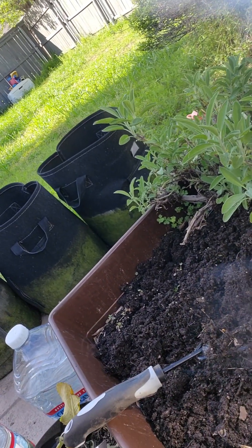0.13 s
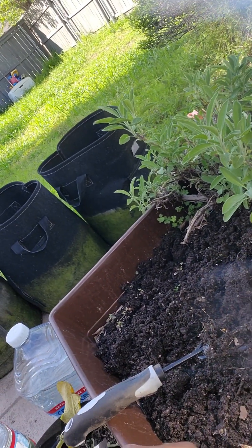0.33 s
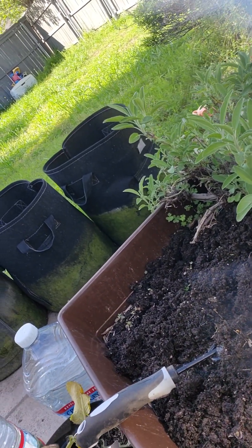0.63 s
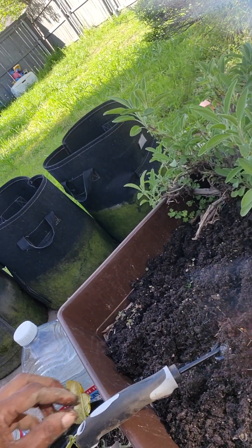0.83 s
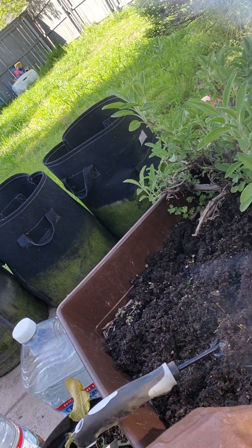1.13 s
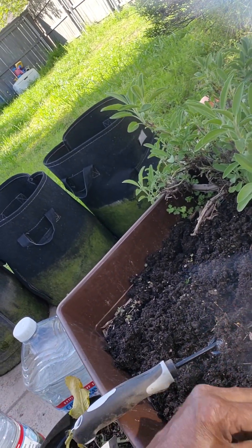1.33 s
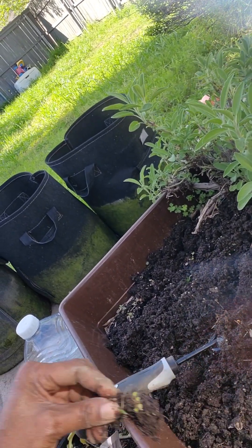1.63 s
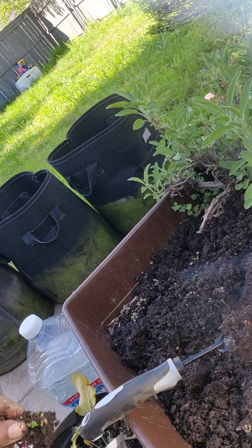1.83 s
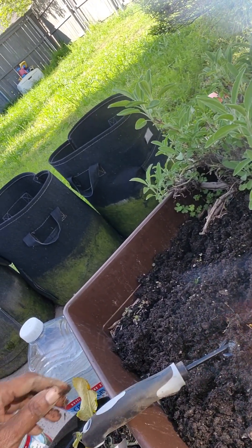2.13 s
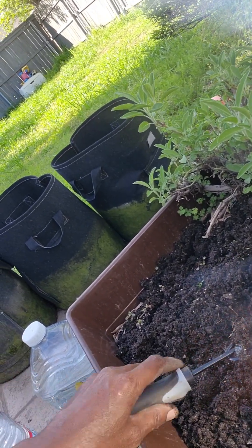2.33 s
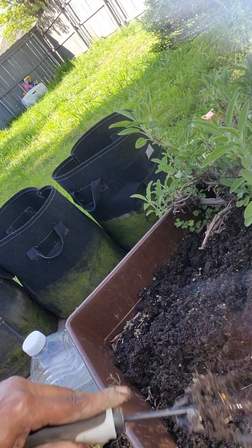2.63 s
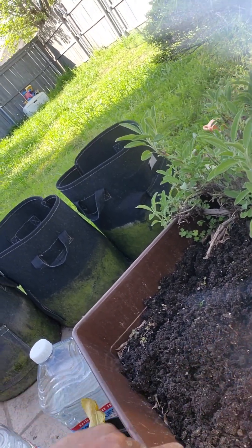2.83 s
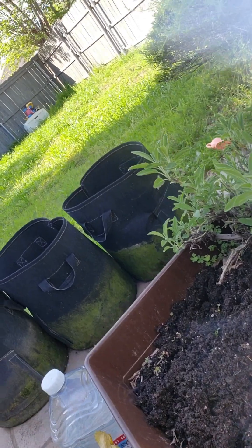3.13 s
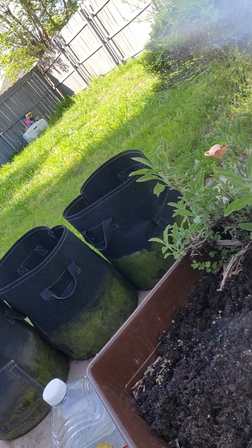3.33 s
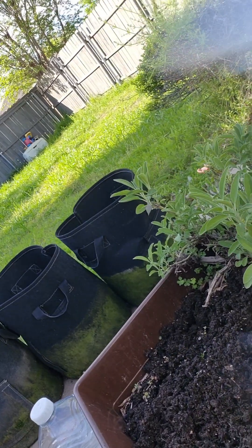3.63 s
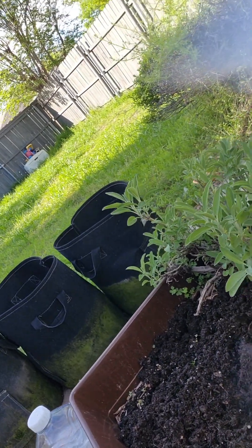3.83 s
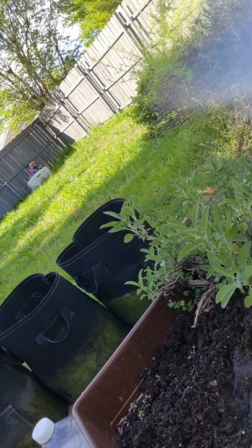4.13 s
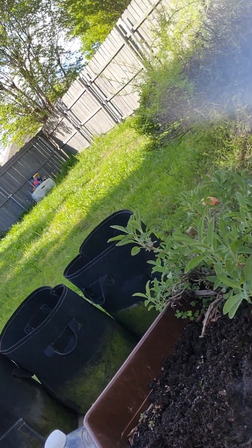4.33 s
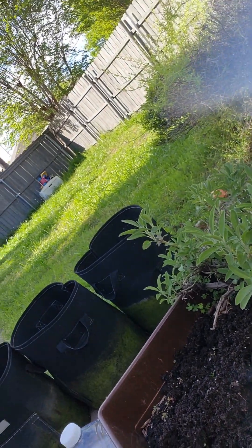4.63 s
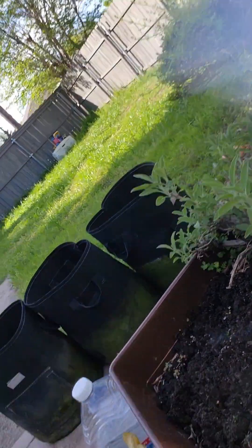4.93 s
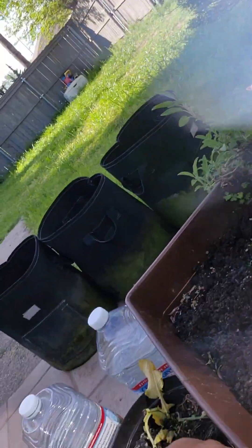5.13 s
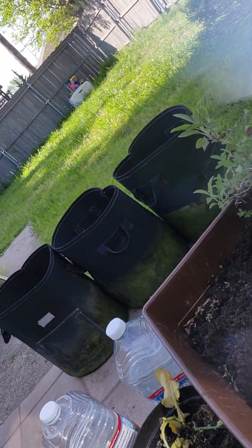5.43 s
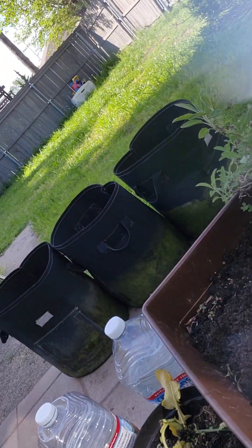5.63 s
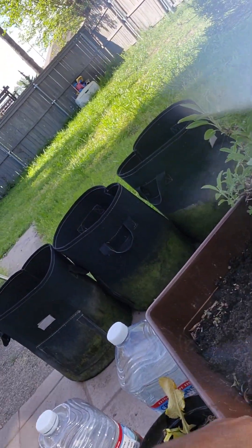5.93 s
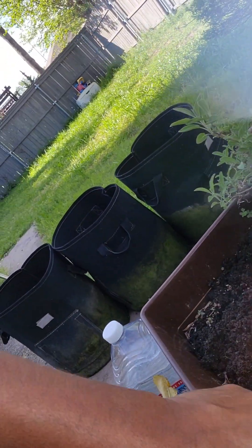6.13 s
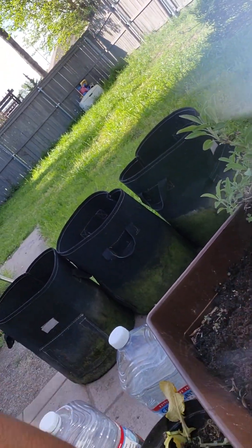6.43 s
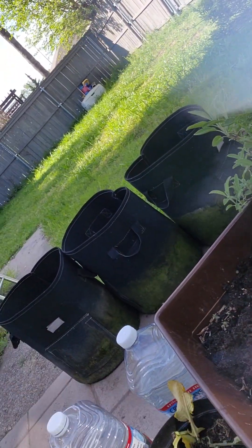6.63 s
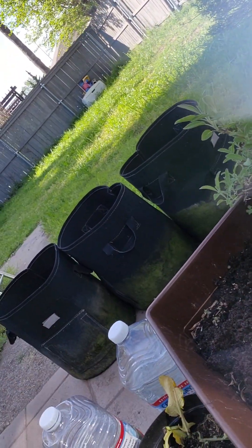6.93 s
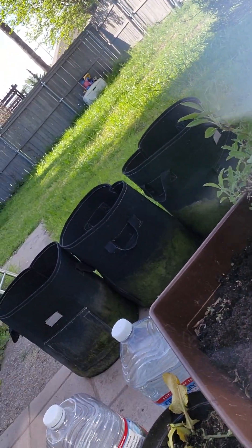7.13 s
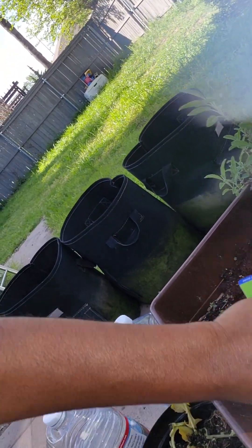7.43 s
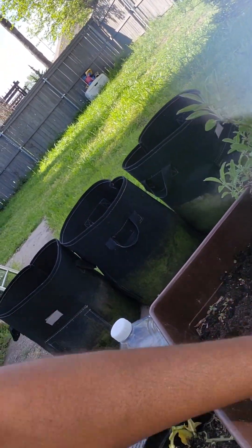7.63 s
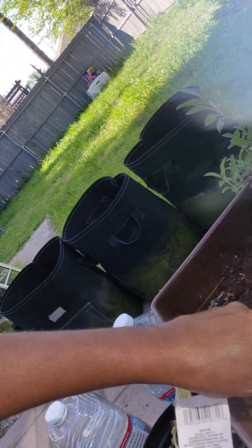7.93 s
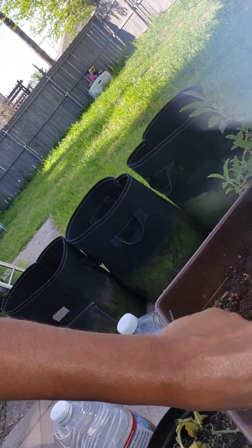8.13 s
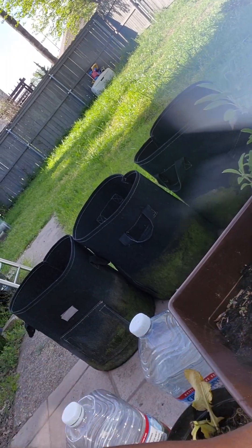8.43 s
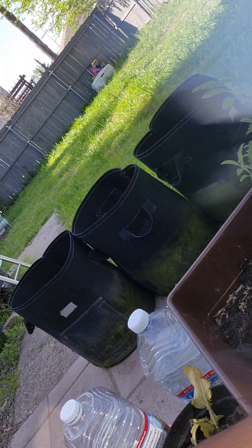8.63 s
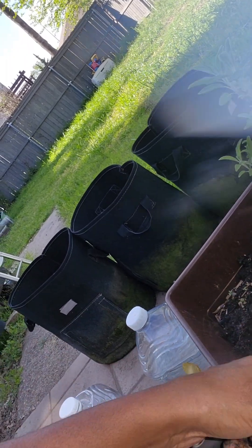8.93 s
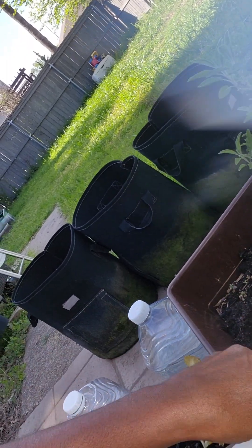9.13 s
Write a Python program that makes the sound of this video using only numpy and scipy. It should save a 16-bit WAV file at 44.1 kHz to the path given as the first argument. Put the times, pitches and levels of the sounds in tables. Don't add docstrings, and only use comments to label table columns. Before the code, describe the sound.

Outdoors in a back garden, a close stereo microphone catches hands working in a planter. Light leaf ticks come first, then denser rustling, soil scuffs and snapping stalks. A loud dry crack comes before the middle, then a pot is struck and, a second later, the hollow planter. Crackling continues and thins out over a low cooling-unit hum and distant traffic.

```python
import sys
import numpy as np
from scipy import signal
from scipy.fft import rfft, irfft
from scipy.io import wavfile

SR = 44100
rng = np.random.default_rng(int(sys.argv[2]) if len(sys.argv) > 2 else 0)


def to_wav(sig):
    pcm = np.clip(np.atleast_2d(sig), -1, 1) * 32767
    pcm = np.round(pcm).astype(np.int16)
    wavfile.write(sys.argv[1], SR, pcm.T)


def rack_gain(trim_db):
    fader = np.asarray(trim_db, float)
    return 10 ** (fader / 20)


N = 409248
CONTROL_STEP = 20

# (time [s], level [dB])
BREEZE = [(0.0, -51.5), (2.38, -56), (3.85, -51.5), (3.93, -46.5), (4.01, -58.5), (5.5, -48.5), (5.56, -53),
          (7.0, -51), (7.11, -47.5), (7.42, -60.5), (7.65, -49.5), (7.68, -66.5), (7.75, -51), (9.28, -55)]
# (time [s], level [dB])
UNIT = [(0, -46), (1.7, -49.5), (2.04, -46), (3.49, -45.5), (3.62, -37.5), (3.9, -41), (4.34, -43.5),
        (4.55, -40), (4.88, -48.5), (5.27, -51), (5.45, -37.5), (5.63, -47), (6.12, -51), (7.78, -47.5),
        (9.28, -42.5)]
# (time [s], level [dB])
TRAFFIC = [(0, -56), (3.49, -54.5), (3.9, -53.5), (4.55, -47), (4.88, -51.5), (5.27, -52), (5.45, -49.5),
           (5.63, -54), (6.2, -50.5), (7.78, -53.5), (9.28, -52.5)]
# (frequency [Hz], density [dB per Hz])
AIR_SPECTRUM = [(15, -27.5), (28, -4), (45, -4), (111, -1), (180, -9), (242, -9.5), (370, -12.5),
                (480, -19), (720, -24), (1000, -33), (1500, -50), (2300, -47.5), (7300, -52.5),
                (16000, -63)]
# (frequency [Hz], correlation, clipped to -1..1)
AIR_LIKENESS = [(30, 0.94), (70, 0.91), (130, 0.99), (290, 0.83), (640, 0.71), (1410, -2.1), (3100, 0.42),
                (15000, -0.66)]
# (frequency [Hz], left minus right [dB])
AIR_LEAN = [(60, -2.0), (240, 0.5), (950, -0.5), (3770, -5), (15000, 3)]
# (frequency [Hz], wander [Hz], level [dB])
MOTOR_TONES = [(236.3, 1.9, -57), (313.3, 7.1, -64.5), (352.3, 8.14, -63), (709.6, 1.2, -71.5),
               (890, 1.05, -76.5)]
CASING_HZ, CASING_WIDTH_HZ, CASING_DB = 118.2, 29, -49

# (start [s], hold [s], level [dB], dullness [dB])
REACHES = [(0.088, 0.02, -78, -14), (0.156, 0.038, -73, -3), (0.333, 0.22, -90, -6),
           (1.27, 0.095, -90, -14), (2.28, 0.8, -73.5, 2), (2.97, 0.26, -64, 4), (3.27, 0.86, -66.5, 3.5),
           (3.647, 0.042, -58.5, 0.5), (4.112, 0.17, -60.5, 3), (4.223, 0.068, -62.5, 1),
           (4.375, 0.088, -59.5, -0.5), (4.515, 0.28, -59, 2), (4.857, 0.12, -71.5, 6),
           (5.17, 0.2, -58.5, 1.5), (5.408, 0.19, -60.5, 1), (5.618, 0.15, -68.5, -2.5),
           (6.053, 0.087, -67.5, 3.5), (6.204, 0.049, -54.5, 0.5), (6.314, 0.53, -60.5, 1),
           (6.9, 0.34, -67, -2.5), (7.152, 0.13, -62, 6.5), (7.352, 0.3, -64.5, -1),
           (7.595, 0.089, -63.5, 6), (7.767, 0.15, -64.5, 1.5), (8.047, 0.16, -65, 5),
           (8.23, 0.32, -66, -1), (8.443, 0.16, -63, 3), (8.626, .2, -69, 1.5), (8.956, 0.11, -69.5, 0)]
REACH_IN_DB_PER_S, REACH_OUT_DB_PER_S = 222.5, 131.5
# dull, middle, bright part [dB]
REACH_COLOUR_DB = [-6.5, 2, -3]
# dull, middle, bright part [dB]
REST_DB = [-70, -106, -82]
# (time [s], length [s], level [dB], dullness [dB])
SCUFFS = [(0.59, 0.05, -79.5, -16), (0.73, 0.039, -62.5, 6.5), (1.21, 0.11, -71.5, -3),
          (1.898, 0.036, -68.5, -10), (2.027, 0.067, -57.5, 6.5), (2.365, 0.12, -61, 5),
          (2.788, 0.016, -53, 1.5), (2.8, 0.023, -44.5, -2), (2.821, 0.024, -52.5, 5),
          (2.842, 0.028, -54, -2), (2.979, 0.11, -56, 1), (4.185, 0.17, -65, 14), (4.507, 0.062, -68, 15.5),
          (4.654, 0.074, -47, 8), (5.152, 0.005, -50, -10), (5.189, .011, -60, -7), (5.399, 0.16, -54, 5.5),
          (6.237, 0.036, -50, -1), (6.44, 0.029, -54, 6.5), (6.533, 0.1, -54.5, 2), (7.033, 0.083, -59, 5),
          (7.151, 0.019, -46, 5), (7.152, 0.067, -55, 4), (7.226, 0.028, -64.5, 26.5),
          (8.048, 0.096, -63, 7), (8.115, 0.071, -51.5, 7), (8.46, 0.22, -68.5, 15)]
# (time [s], peak [dB], dullness [dB])
LEAVES = [(0.0925, -41, -20), (0.16, -37, -6), (0.7202, -30, -2.5), (1.315, -52, -7), (2.072, -46, -12),
          (2.19, -47.5, -5), (1.3658, -59, -10), (1.9031, -54, -8), (2.0393, -49, 6), (2.361, -53, -3),
          (2.5945, -50, -4), (2.6564, -57, -13), (3.1462, -47, 0), (3.2041, -47, -3), (3.6122, -52, 4),
          (6.0422, -53, -3), (6.2886, -43, -8), (6.7875, -48, 2), (9.0, -48, 8), (2.754, -35, -6),
          (2.8444, -52, -2), (3.337, -46, -4), (3.4147, -46, -3), (3.376, -46, 3), (3.6995, -15, 7.5),
          (3.739, -45, -6), (4.3625, -46, 6), (4.535, -44, -8), (5.1162, -26, 14), (5.6146, -42, -8.5),
          (5.7586, -41, 11), (6.187, -35.5, -11), (6.2243, -32.5, -7), (6.248, -25, -3), (6.8003, -37.5, 6),
          (6.884, -36, -2), (7.004, -31, 0.5), (7.0306, -36.5, -5), (7.0427, -36, 3), (7.0355, -35.5, 0),
          (7.0558, -38.5, 9), (7.066, -30.5, -1), (7.072, -31.5, 7), (7.1559, -25, -1), (7.297, -38, 12),
          (7.409, -45, -1), (7.412, -39, -7), (7.418, -36, 1), (6.995, -42, 4), (7.02, -55, 4),
          (7.177, -40, 1), (7.192, -40, -2), (.395, -56, -1), (2.738, -50, -2), (8.165, -44, 2),
          (8.086, -35.5, 10), (8.069, -45, 5), (8.078, -45, 4), (5.228, -42, 2), (3.59, -52, -3),
          (3.93, -47, 13), (8.4098, -41.5, 8)]
# (time [s], peak [dB], dullness [dB])
STALKS = [(.0761, -69, -19), (.7821, -50.5, 3), (.821, -46, -3), (.8275, -49, -13), (.835, -43.5, 1),
          (2.3056, -52, -1), (2.417, -43.5, 10), (2.4473, -49, 15.5), (2.424, -45, 6), (4.143, -50, 14),
          (2.5612, -48.5, 0), (2.7476, -44.5, 16.5), (2.8085, -31.5, 5), (2.96, -39.5, -7),
          (3.768, -44.5, 2.5), (4.0895, -58, -21), (4.1071, -28, 1.5), (4.295, -46, 9), (4.436, -46, 7),
          (4.672, -31, 8), (4.693, -38, -4), (4.938, -48, 7), (6.0614, -52, -6), (6.2515, -32, -10.5),
          (6.571, -41.5, 11), (7.827, -55, 21), (7.87, -50, 11), (7.231, -46, 24), (4.521, -51, 11),
          (4.718, -52.5, 4), (8.1191, -35, 1), (8.144, -44, 7), (8.59, -36.5, 8), (8.82, -56, 16),
          (8.957, -54.5, -6)]
LEAF_HUMP_DB, STALK_HUMP_DB, SCUFF_HUMP_DB = 10.5, 2, 5.5
LEAF_FLOOR_DB, BROAD_FLOOR_DB = -31.5, -10
SNAP_T60_S, CLICK_DB, SCATTER_DB = 0.009, 12, -14.5
# (frequency [Hz], gain [dB])
HAND_COLOUR = [(500, -21.5), (800, 10.5), (1500, 8), (2500, 1.5), (3700, -5.5), (4800, -1.5), (6200, -6),
               (7500, -4.5), (8700, 1.5), (10500, -5), (12500, -2), (14500, -1), (16500, -9)]
# (frequency [Hz], left minus right [dB])
HAND_LEAN = [(60, -2.0), (180, -0.5), (550, 4), (1650, -1.5), (4970, -3.5), (15000, -5.5)]
HAND_LAG_S, WALL_LAG_S = 0.00026, 0.00017

# (time [s], frequency [Hz], level [dB], blur [Hz])
WHINE = [(1.0, 1950, -86, 80), (1.15, 1980, -88, 80), (1.18, 2090, -78, 50), (1.29, 2160, -83, 50),
         (1.31, 2230, -75, 10), (1.37, 2230, -77, 10), (1.39, 2400, -95, 60), (1.41, 2580, -78, 40),
         (1.56, 2600, -85, 90), (1.66, 2780, -83, 90), (1.68, 3050, -81, 50), (1.84, 3050, -81, 60),
         (1.87, 2900, -83, 110), (2.15, 2900, -81, 120), (2.7, 2920, -78, 120), (3.15, 2650, -71, 150),
         (3.3, 2450, -73, 150), (3.55, 2100, -105, 150)]

# (time [s], peak [dB], wall pitch [Hz], hardness [dB], t60 [s])
TAPS = [(2.308, -45.5, 316, -22, 0.02), (2.414, -50.5, 454, 4, 0.025), (2.422, -47, 446, -6, 0.026),
        (2.794, -49.5, 437, -16, 0.047), (2.812, -44.5, 290, -5, 0.038), (3.266, -40.5, 290, -9, 0.02),
        (4.541, -42.5, 303, -7, 0.05), (4.67, -45.5, 610, 6, 0.023), (5.314, -52.5, 440, -5, 0.057),
        (5.412, -33, 281, 7, 0.044), (5.46, -33.5, 313, -9, 0.071), (6.223, -50.5, 293, -8, 0.15),
        (6.478, -39.5, 279, -42, 0.042), (7.156, -56.5, 645, -29, 0.059), (7.23, -40.5, 335, 16.5, 0.022),
        (8.19, -51.5, 317, 3, 0.037), (8.41, -52.5, 670, -26, 0.025), (8.593, -47, 430, 17.5, 0.02),
        (8.69, -69, 437, -35, 0.036), (8.897, -52.5, 462, -60, 0.049)]
# (pitch ratio, level [dB])
WALL_OVERTONES = [(1.0, 14), (1.55, 6.5), (2.2, 8), (3.3, 5.5), (4.4, -17)]
UPPER_DB, UPPER_PER_HARDNESS = -8.5, 0.22
TOP_PER_HARDNESS = 0.3
# (time [s], peak [dB], crack [dB], crack dullness [dB], tail [dB])
BLOWS = [
    (5.1181, -9, -22.5, 1, -23),
    (5.1217, -24.5, -33, 7, -35),
    (6.1178, -6, -22, 7.5, -27.5),
    (6.133, -16, -48.5, 9, -40),
]
SOFT_DB_PER_OCTAVE = [0.6, 3, 0.69, 15]
TAIL_BOOM_DB = [-7, -6, 0.5, -1.5]
# (frequency [Hz], level [dB], t60 [s])
POT_MODES = [(136, -2.5, 0.029), (290, 4, 0.062), (401.6, -13.5, 0.17), (563, -10, .06), (660, -3, 0.065),
             (814, -1.5, 0.021), (1028, -8.5, 0.04), (1370, -9.5, 0.06), (1560, -11, 0.064),
             (1960, 1, 0.016), (2730, -10.5, 0.065), (4470, 3, 0.0077)]
# (frequency [Hz], level [dB], t60 [s])
PLANTER_MODES = [(137.7, -7.5, 0.053), (231, -54.5, 0.11), (318, 0.5, 0.026), (466, 3, 0.032),
                 (574, -2, 0.028), (626, 6, 0.022), (730, -21, 0.023), (962, 2, 0.0091),
                 (1212, -4.5, 0.054), (1500, -36, 0.027), (2270, 2, 0.023), (2940, -14, 0.0146),
                 (3450, -26.5, 0.011)]
BUILD_UP_CYCLES = 0.44
# (frequency [Hz], left minus right [dB])
WALL_LEAN = [(120, 1), (300, 8), (600, 1), (1500, -5.5), (2400, -5), (4000, -0.5), (12000, -8)]
# (frequency [Hz], share [0..1])
WALL_LIKENESS = [(600, .8), (1100, .55), (3000, .4)]


def rms_one(x):
    return x / np.sqrt(np.mean(x ** 2) + 1e-20)


def in_time(rows):
    s, *columns = np.transpose(rows)
    step_s = np.arange(N // CONTROL_STEP + 2) * CONTROL_STEP / SR
    return [np.interp(step_s, s, column) for column in columns]


def fine(control):
    return np.interp(np.arange(N) / CONTROL_STEP, np.arange(len(control)), control)


def drift(rate_hz):
    r = np.exp(-2 * np.pi * CONTROL_STEP * rate_hz / SR)
    chance = rng.standard_normal(N // CONTROL_STEP + 2002)
    return rms_one(signal.lfilter([1], [1, -2 * r, r * r], chance)[2000:])


def at_hz(points, hz):
    points_hz, values = np.transpose(points)
    return np.interp(np.log(hz), np.log(points_hz), values)


def lean_gain(points, hz):
    return rack_gain(at_hz(points, hz) / 2 * np.array([[1], [-1]]))


def fft_hz():
    return np.maximum(np.arange(N // 2 + 1) * SR / N, 1)


def colour(x, points):
    return irfft(rfft(x) * rack_gain(at_hz(points, fft_hz())), N)


def band(x, low_hz, high_hz):
    return signal.sosfilt(signal.butter(2, [low_hz, high_hz], "band", fs=SR, output="sos"), x)


def add(track, sound, s):
    i = round(s * SR)
    track[..., i:i + sound.shape[-1]] += sound[..., :N - i]


def garden_air():
    swells_db = [db - db.mean() for db in in_time(BREEZE) + in_time(UNIT) + in_time(TRAFFIC)] + [0]
    edges_hz = [22, 42, 85, 135, 200, 320, 500, 750, 1100, 1800, 3500, 8000, 17000]
    white = rng.standard_normal((2, 2, N))
    out = 0
    for k, (low, high) in enumerate(zip(edges_hz, edges_hz[1:])):
        mid, side = band(white[k % 2], low, high)
        hz = np.sqrt(low * high)
        alike = np.clip(at_hz(AIR_LIKENESS, hz), -1, 1)
        swell_db = swells_db[np.searchsorted([85, 140, 1000], hz)]
        gain = fine(rack_gain(swell_db - 25.5 + 2.6 * drift(4.2)))
        pair = np.sqrt(1 + alike) * mid + np.sqrt(1 - alike) * side * [[1], [-1]]
        out = out + gain * lean_gain(AIR_LEAN, hz) * pair
    out = colour(out, AIR_SPECTRUM)
    for hz, wander_hz, level_db in MOTOR_TONES:
        phase = np.cumsum(fine(hz + wander_hz * drift(2.963))) * 2 * np.pi / SR
        out += fine(np.sqrt(2) * rack_gain(level_db + 0.95 * drift(7))) * np.sin(phase)
    return out


def casing():
    r = np.exp(-np.pi * CASING_WIDTH_HZ / SR)
    poles = [1, -2 * r * np.cos(2 * np.pi * CASING_HZ / SR), r * r]
    boom = rng.standard_normal(N)
    for _ in range(2):
        boom = signal.lfilter([1, 0, -1], poles, boom)
    unit_db, = in_time(UNIT)
    return rms_one(boom) * fine(rack_gain(CASING_DB + unit_db - unit_db.mean()))


def grit(per_s, spread_db, clump_db, bed):
    sizes = rack_gain(spread_db * np.minimum(rng.exponential(1, N), 4))
    born = rng.random(N) < per_s * fine(rack_gain(clump_db * drift(25))) / SR
    return rms_one(bed + rms_one(signal.lfilter([1], [1, -0.97], sizes * born)))


def tilt(hz, dull_db, hump_db, floor_db):
    low_db = dull_db - hump_db
    levels_db = [low_db + floor_db, low_db - 0.5, 0, 0.5 - dull_db - hump_db]
    return np.interp(np.log(hz), np.log([1200, 2500, 6000, 12500]), levels_db)


def reaching(hz):
    t = np.arange(N // CONTROL_STEP + 2) * CONTROL_STEP / SR
    place = np.interp(np.log(hz), np.log([1600, 3900, 10500]), [0, 1, 2])
    power = rack_gain(2 * np.interp(place, range(3), REST_DB))
    colour_db = np.interp(place, range(3), REACH_COLOUR_DB)
    for s, hold_s, level_db, dull_db in REACHES:
        rise_db = REACH_IN_DB_PER_S * np.maximum(s - t, 0)
        fall_db = REACH_OUT_DB_PER_S * np.maximum(t - s - hold_s, 0)
        power = power + rack_gain(2 * (level_db + colour_db + dull_db * (1 - place) - rise_db - fall_db))
    return np.sqrt(power)


def from_below(x, other, alike, lag_s):
    alike = np.clip(alike, 0, 1)
    late = np.roll(x, round(lag_s * SR))
    return np.array([alike * late + np.sqrt(1 - alike ** 2) * other, x])


def hands():
    snaps = [(*row, LEAF_HUMP_DB, LEAF_FLOOR_DB) for row in LEAVES]
    snaps += [(*row, STALK_HUMP_DB, BROAD_FLOOR_DB) for row in STALKS]
    bed = grit(600, 3.6, 4.5, 2.0)
    coarse = grit(600, 3.4, 3.5, 1.3)
    white = rng.standard_normal((2, 2, N))
    t = np.arange(SR // 12) / SR
    tints = rng.standard_normal((len(snaps), 16))
    crack = rack_gain(-60 * t / SNAP_T60_S) + rack_gain(SCATTER_DB - 60 * t / 0.04)
    strokes = [np.sin(np.pi * np.linspace(0, 1, round(1.146 * row[1] * SR)) ** 0.61) for row in SCUFFS]
    edges_hz = 700 * 2 ** (np.arange(0, 12.6) / 2.6)
    out = 0
    for k, (low, high) in enumerate(zip(edges_hz, edges_hz[1:])):
        hz = np.sqrt(low * high)
        grains = np.roll(bed if hz > 2000 else np.sqrt(bed), k // 4 * SR)
        rub = fine(reaching(hz) * rack_gain(7.5 + 2 * drift(3.3))) * grains
        scuff, burst, click = np.zeros((3, N))
        for (s, _, level_db, dull_db), stroke in zip(SCUFFS, strokes):
            tilt_db = tilt(hz, dull_db, SCUFF_HUMP_DB, BROAD_FLOOR_DB)
            add(scuff, rack_gain(level_db + tilt_db + 8.5) * stroke, s)
        for (s, peak_db, dull_db, hump_db, floor_db), tint in zip(snaps, tints):
            size = rack_gain(peak_db + tilt(hz, dull_db, hump_db, floor_db) + 0.78 * tint[k] + 1.0)
            add(burst, size * crack, s)
            add(click, size * rack_gain([CLICK_DB]) * np.sign(tint[-1]), s)
        alike = at_hz([(700, 0.7), (4000, 0.16), (16000, 0.27)], hz)
        source = white[k % 2] * np.sqrt(rub ** 2 + (scuff * coarse) ** 2 + burst ** 2)
        pair = from_below(*source, alike, HAND_LAG_S) + from_below(click, click, 0.86, HAND_LAG_S)
        out = out + band(pair, low, high) * lean_gain(HAND_LEAN, hz)
    return colour(out, HAND_COLOUR)


def far_whine():
    hz, level_db, blur_hz = in_time(WHINE)
    phase = np.cumsum(fine(hz + 20 * drift(8) + blur_hz * drift(70))) * 2 * np.pi / SR
    sides = [fine(drift(90)) * np.sin(phase) + fine(drift(90)) * np.cos(phase) for _ in "LR"]
    return fine(rack_gain(level_db + 2 * drift(16))) * np.array(sides)


def ring(hz, t60_s, rise_s):
    t = np.arange(SR // 4) / SR
    decay = rack_gain(-60 * t / max(t60_s, 0.003))
    return np.sin(2 * np.pi * hz * t) * decay * (1 - np.exp(-t / max(rise_s, 1e-5)))


def rattle(level_db, low_hz, high_hz, t60_s):
    t = np.arange(SR // 6) / SR
    noise = rng.standard_normal((2, len(t))) * rack_gain(level_db - 60 * t / max(t60_s, 0.003))
    steep = band(band(noise, low_hz, high_hz), low_hz, high_hz)
    return steep * np.sqrt(SR / 2 / (high_hz - low_hz))


def soft_taps(out):
    for s, peak_db, hz, hard_db, t60_s in TAPS:
        upper_db = UPPER_DB + UPPER_PER_HARDNESS * hard_db + 10.0
        top_db = TOP_PER_HARDNESS * min(hard_db, 0)
        chances = rng.standard_normal((len(WALL_OVERTONES), 2))
        for (ratio, part_db), (detune, loudness) in zip(WALL_OVERTONES, chances):
            mode = ring(hz * ratio * (1 + 0.055 * detune), t60_s / np.sqrt(ratio), 0.63 / hz / ratio)
            level_db = peak_db + part_db + upper_db * (ratio > 1.3) + top_db * (ratio > np.e)
            add(out, rack_gain(level_db + 2.0 * loudness + 5.0) * mode * [[1], [-0.4]], s)
        add(out, rattle(peak_db + hard_db, 1020, 3490, 0.65 * t60_s), s)
        add(out, rattle(peak_db + hard_db - 23.0, 3600, 12300, 0.014), s)
        add(out, rattle(peak_db - 0.5, 113, 1080, 1.9 * t60_s), s)
        add(out, rattle(peak_db - 11.0, 270, 1000, 0.28), s)


def hard_blows(out):
    bodies = (POT_MODES, POT_MODES, PLANTER_MODES, PLANTER_MODES)
    for blow, body, soft_db, boom_db in zip(BLOWS, bodies, SOFT_DB_PER_OCTAVE, TAIL_BOOM_DB):
        s, peak_db, crack_db, dull_db, tail_db = blow
        for k, (hz, part_db, t60_s) in enumerate(body):
            level_db = peak_db + part_db - 4 - soft_db * max(np.log2(hz / 700), 0)
            other_path = np.clip(np.log(hz / 400), -0.6, 0.9) * (-1) ** k
            add(out, rack_gain(level_db) * ring(hz, t60_s, BUILD_UP_CYCLES / hz) * [[-1], [other_path]], s)
        add(out, rattle(crack_db + dull_db, 1500, 4000, 0.022), s)
        add(out, rattle(crack_db - 1.5, 4000, 8000, 0.014), s)
        add(out, rattle(crack_db - dull_db, 8000, 17000, 0.012), s)
        add(out, rattle(tail_db + boom_db, 220, 920, 0.19), s)
        add(out, rattle(tail_db + 0.5, 680, 3100, 0.11), s)
        add(out, rattle(tail_db - 7.5, 2100, 4800, 0.14), s)
        add(out, rattle(tail_db - 11.5, 4200, 15000, 0.093), s)


def knocks():
    out = np.zeros((2, N))
    soft_taps(out)
    hard_blows(out)
    hz = fft_hz()
    alike = np.clip(at_hz(WALL_LIKENESS, hz), 0, 1)
    near, other = rfft(out)
    late = near * np.exp(-2j * np.pi * hz * WALL_LAG_S)
    left = alike * late + np.sqrt(1 - alike ** 2) * other
    return irfft(np.array([left, near]) * lean_gain(WALL_LEAN, hz), N)


def scene():
    return garden_air() + casing() + hands() + far_whine() + knocks()


def top_cut(x):
    return signal.sosfilt(signal.butter(12, 17070, fs=SR, output="sos"), x)


def record(dry):
    mix = signal.sosfilt(signal.butter(4, 36, "high", fs=SR, output="sos"), dry)
    mix = signal.sosfilt(signal.cheby2(14, 27, 16000, fs=SR, output="sos"), mix)
    return top_cut(mix)


dry = scene()
out = record(dry)
to_wav(out)
```